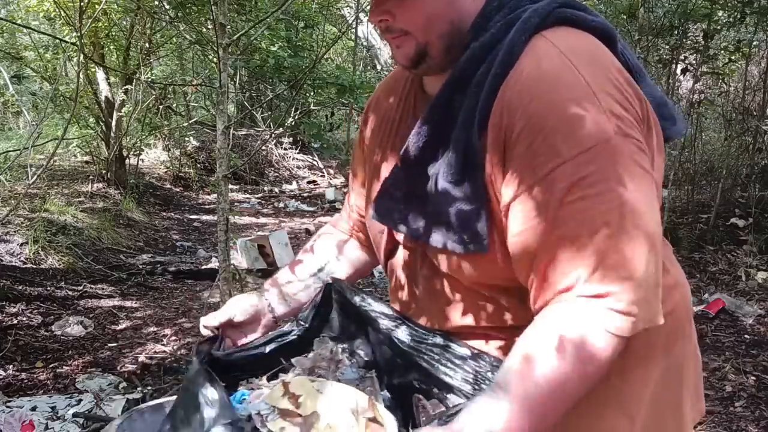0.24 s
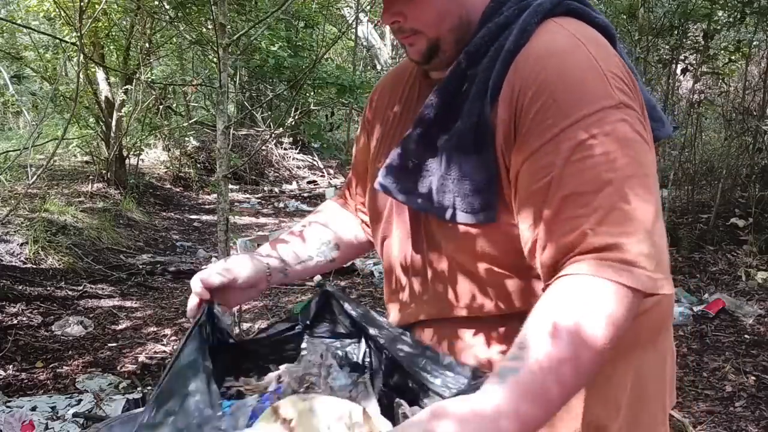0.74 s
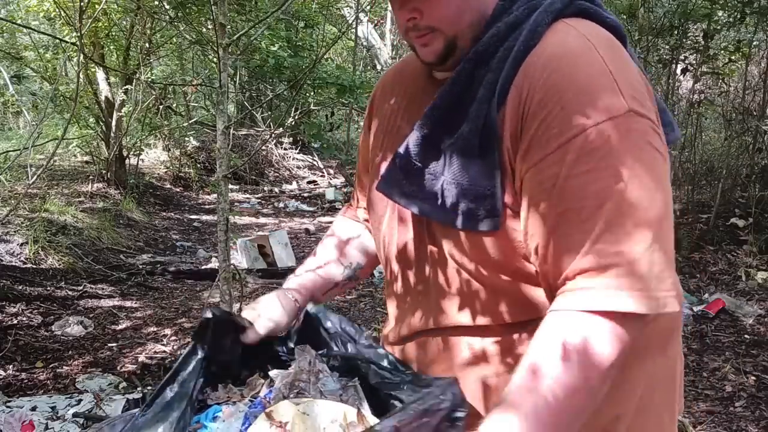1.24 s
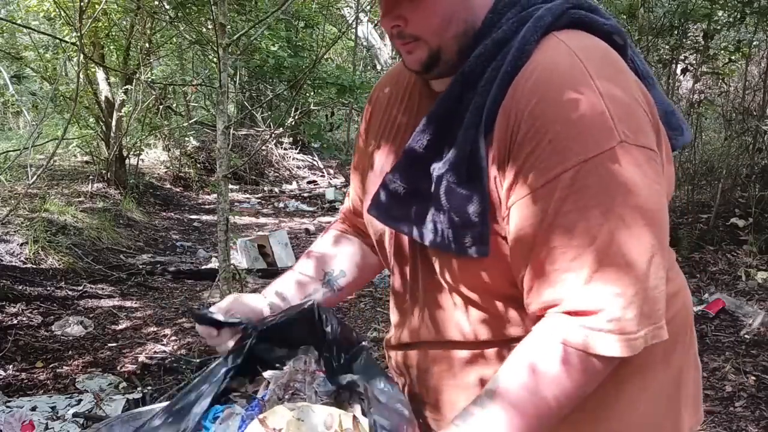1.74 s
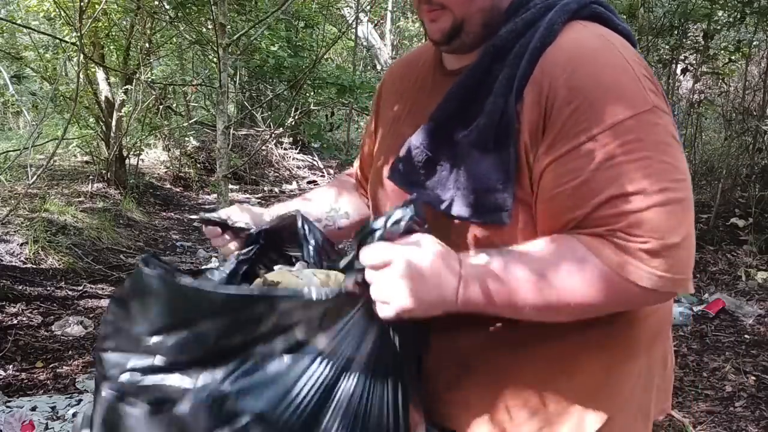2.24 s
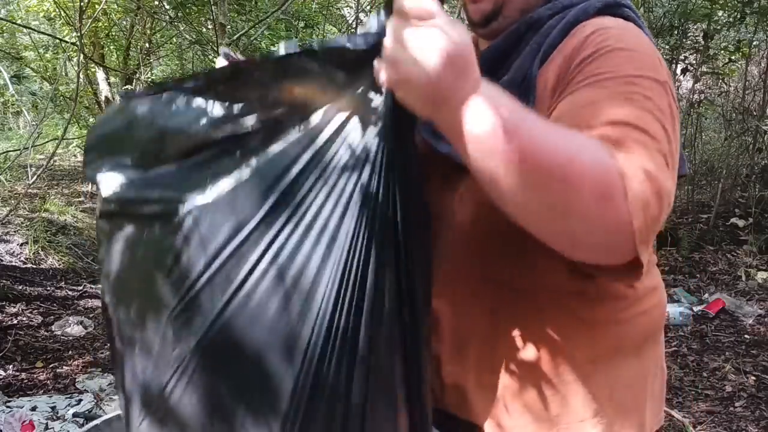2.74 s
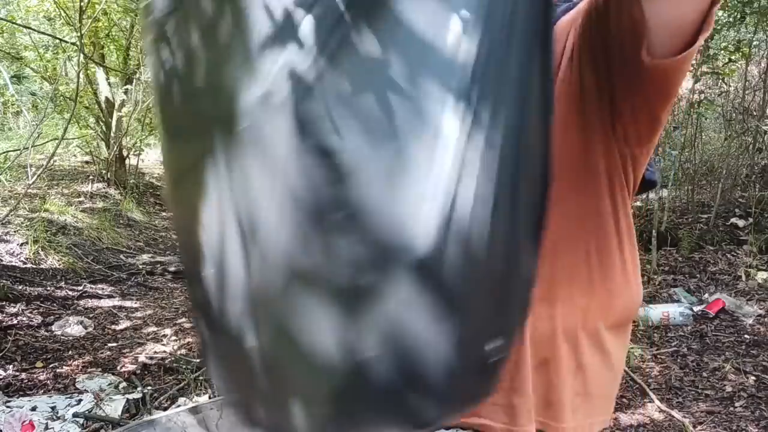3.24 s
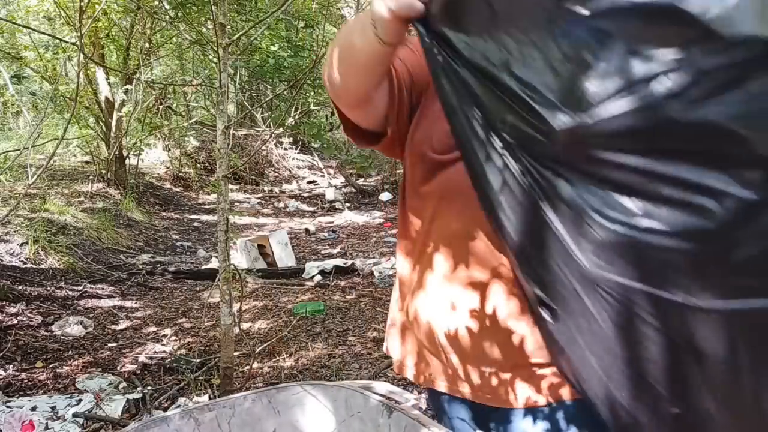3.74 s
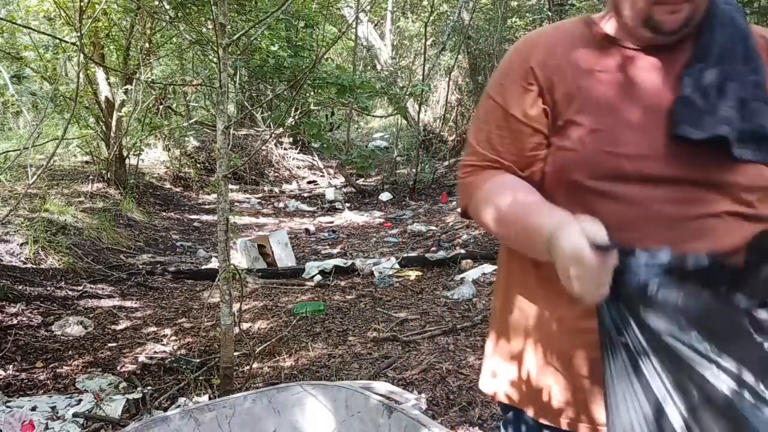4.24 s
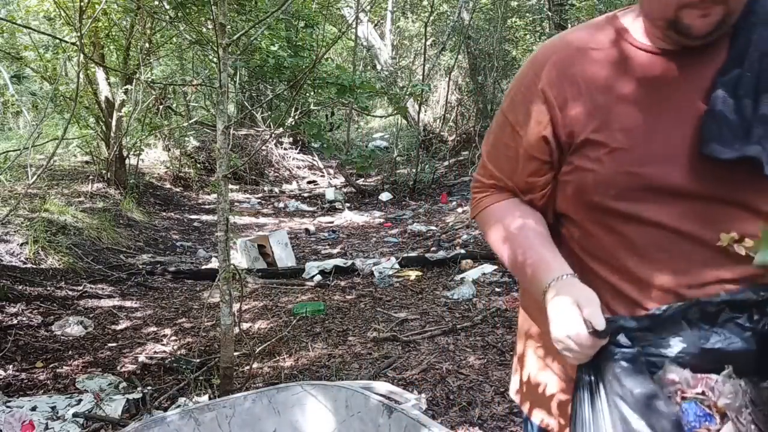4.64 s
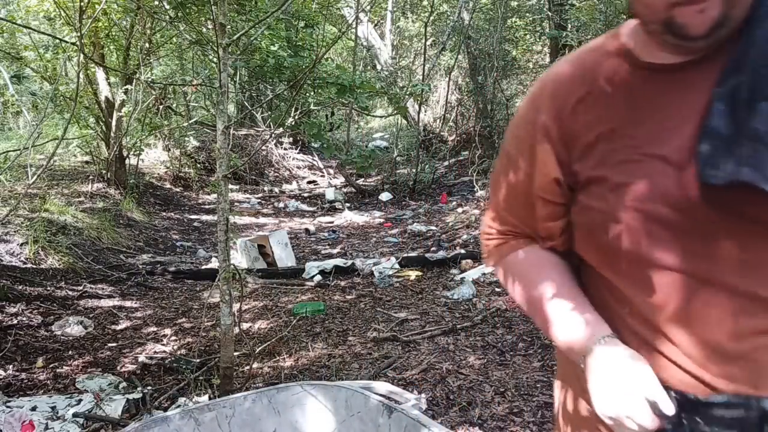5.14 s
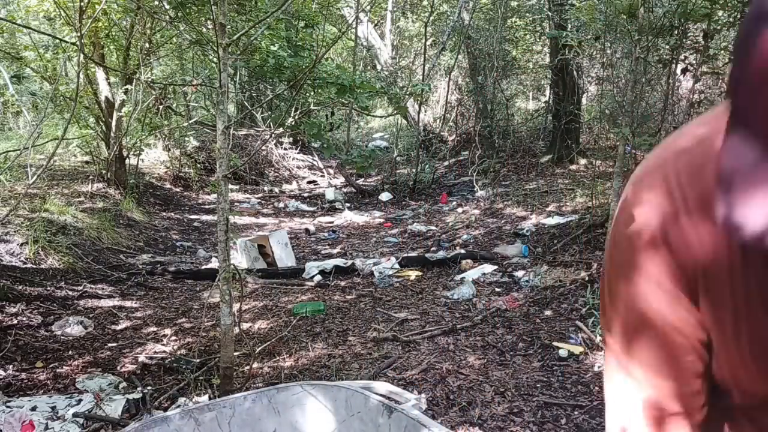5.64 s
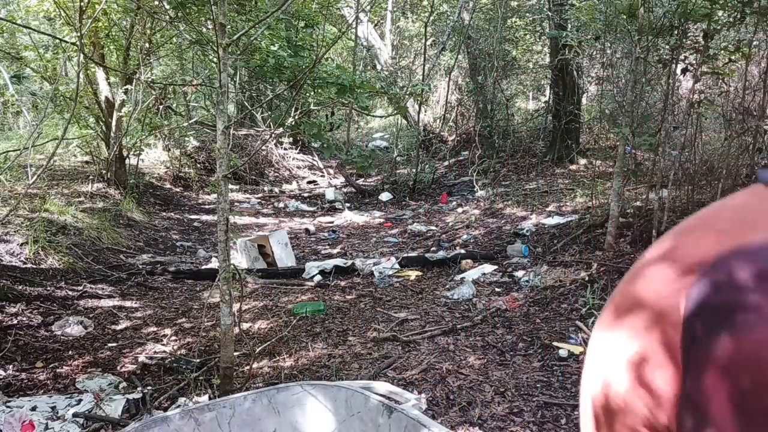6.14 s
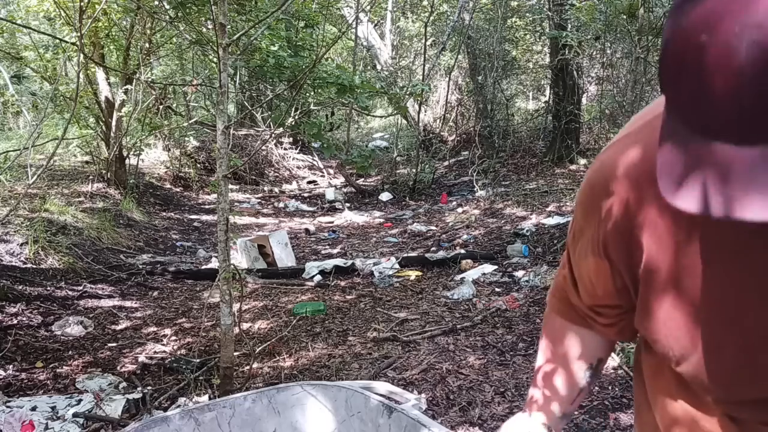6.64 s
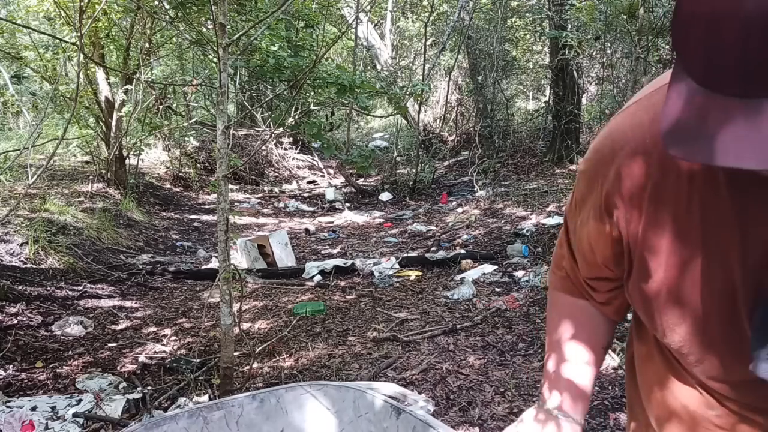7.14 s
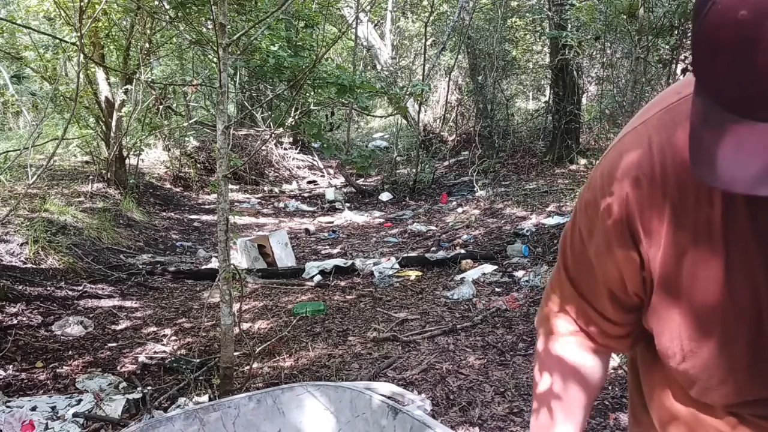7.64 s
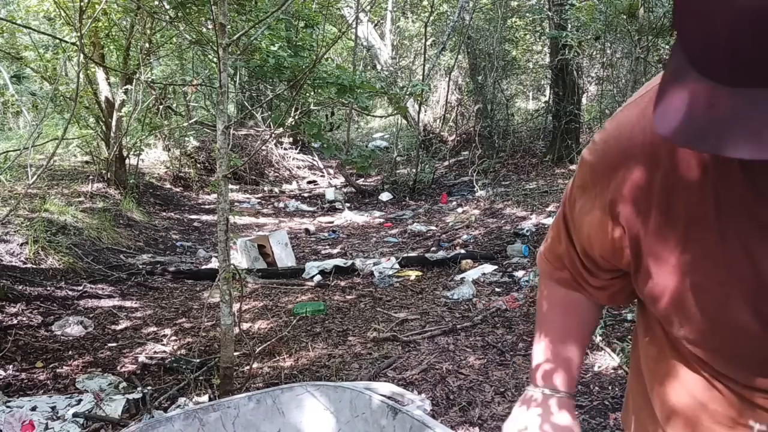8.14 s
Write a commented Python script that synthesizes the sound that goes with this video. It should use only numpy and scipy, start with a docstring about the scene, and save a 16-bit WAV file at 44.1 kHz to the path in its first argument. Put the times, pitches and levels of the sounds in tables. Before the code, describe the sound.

Bright, dry plastic crinkling begins at once on the left, with snapping creases and loose clicks. A heavy clump of muffled litter knocks follows as the bag is lifted, then it quietens and moves rightward. A sudden crunch, softer rustles, a busy rattling, crackling flurry and a few last crinkles follow, close up, with faint outdoor air and very short echo.

```python
"""A thin plastic trash bag of litter starts hissing and crackling at once, in the faint air of a quiet wood.
It is opened, lifted, swung aside and set down, moving from the left of a two-port microphone towards its right.
Film, litter and walls are short grains over noise; knocks and creases that snap are fading tones with noise.
Dry ticks are single clicks, the booms near the end are a low sine, and ground and trunks add a short echo."""
import sys
import numpy as np
from scipy import signal
from scipy.fft import rfft, irfft, next_fast_len
from scipy.io import wavfile
from scipy.ndimage import uniform_filter1d, map_coordinates

SR = 44100
rng = np.random.default_rng(int(sys.argv[2]) if len(sys.argv) > 2 else 0)


def master(y):
    """Save y as 16-bit WAV."""
    cut = np.clip(np.atleast_2d(y).T, -1, 1)
    pcm = np.round(cut * 32767)  # scale
    wavfile.write(sys.argv[1], SR, pcm.astype(np.int16))


N = 369558  # length in samples

# Colour of the still air: [f/Hz, relative level/dB]
AIR_COLOUR = [(15, -38), (25, -0.5), (70, 4), (560, -33), (936, -36), (4250, -6.5), (8140, -11.5),
              (12200, -6), (16000, -8)]
# Colours of the rustling film, litter and slack walls: [f/Hz, relative level/dB]
FILM_COLOUR = [(710, -12.5), (1200, -4), (1490, -3), (1790, -5), (4650, -2), (8440, -3), (12300, 0.5),
               (15200, -1), (16000, -18)]
LITTER_COLOUR = [(150, -25), (250, 1.5), (429, -2), (568, -1), (737, 0.5), (1040, -1.5), (3000, -5),
                 (3900, -21), (6600, -120)]
WALL_COLOUR = [(15, -57), (25, -6.5), (113, 3), (155, -1), (200, 6.5), (288, -5.5), (450, -1.5), (580, -35),
               (990, -120)]
# Tugs of the hands: [full strength from t/s, held t/s, first film level/dB, last film level/dB,
# litter level against film/dB]
TUGS = [(0, 0.097, -34, -36.5, -14.5), (.135, 0.075, -33, -35.5, -6), (0.368, 0.09, -33.5, -32, -7),
        (0.532, 0.26, -37.5, -39, -8), (.86, 0.096, -46, -47.5, -24), (1.22, 0.2, -43, -37, -36),
        (1.44, 0.35, -38, -34.5, -22.5), (1.8, 0.012, -39.5, -32, -1.5), (1.871, 0.26, -40, -40, -6),
        (2.276, 0.18, -31.5, -37, -9), (2.511, 0.089, -32, -32, -5.5), (2.716, .2, -34, -48, -8.5),
        (2.96, .015, -45.5, -50, 2), (3.035, 0.03, -42, -39, -3.5), (3.15, 0.11, -49, -55, -15),
        (3.43, 0.074, -49, -47.5, -20), (3.639, 0.16, -41.5, -55, -11.5), (3.95, 0.041, -47, -49.5, -21),
        (4.091, 0.2, -37, -37, -12.5), (4.204, 0.029, -22, -21.5, -3.5), (4.32, 0.22, -37, -46.5, -10),
        (4.569, 0.048, -39, -40.5, -5), (4.65, 0.49, -39, -60.5, -12), (4.95, 0.2, -46, -51, -8),
        (5.282, 0.17, -40.5, -38.5, -8), (5.5, 0.17, -39, -29.5, -15), (5.7, 0.21, -34, -35, -0.5),
        (5.83, 0.22, -32.5, -29, -3), (6.16, 0.17, -38, -31.5, -4.5), (6.412, 0.16, -33.5, -29.5, -16),
        (6.6, 0.031, -29.5, -26, -13), (6.72, 0.11, -40, -41.5, -17.5), (6.859, 0.05, -37, -37.5, -13),
        (6.96, 0.04, -44.5, -45, -5.5), (7.09, 0.18, -43.5, -51, -19), (7.38, 0.079, -45.5, -43.5, -34),
        (7.609, 0.17, -35, -35.5, -21.5), (7.822, 0.22, -29, -30, -13.5), (8.34, 0.022, -57, -48, -35.5)]
# Litter knocking together: [t/s, strength level/dB, base ring f/Hz]
KNOCKS = [(0.13, -21, 636), (0.424, -32, 194), (0.544, -29, 230), (1.919, -23, 208), (1.973, -22.5, 248),
          (2.336, -7.5, 218), (2.383, -13.5, 504), (2.422, -25, 193), (2.482, -29, 120), (2.521, -24, 324),
          (2.774, -25, 680), (2.829, -20, 371), (2.869, -24, 71), (3.162, -36, 304), (3.421, -39.5, 291),
          (3.858, -45, 520), (4.458, -31.5, 810), (4.545, -35, 287), (4.836, -31, 406), (4.947, -29, 910),
          (5.475, -34.5, 370), (5.775, -15.5, 895), (5.822, -12, 525), (5.829, -9.5, 607),
          (5.888, -8.5, 580), (5.937, -11, 254), (6.03, -13.5, 606), (6.151, -15, 640), (6.24, -18, 577),
          (6.275, -18, 122), (6.546, -26, 344), (6.957, -35, 270), (7.673, -20.5, 900), (7.688, -21, 920),
          (7.689, -30, 322)]
# Slack walls flopping: [full strength from t/s, held t/s, level/dB]
FLOPS = [(.16, 0.021, -45), (0.398, 0.16, -43), (.62, 0.15, -49.5), (1.93, 0.17, -39), (2.06, 0.13, -45),
         (2.23, 0.082, -42), (2.345, 0.01, -33.5), (2.39, 0.071, -36.5), (2.49, 0.11, -48),
         (2.84, 0.084, -43.5), (2.96, 0.019, -42), (3.17, 0.0097, -48), (3.43, 0.016, -53),
         (4.21, 0.016, -40), (5.7, .26, -62), (6.28, 0.013, -46), (6.97, 0.089, -47.5),
         (7.91, 0.027, -48.5)]
# Creases snapping through: [t/s, strength level/dB, base ring f/Hz, crack level against strength/dB]
SNAPS = [(0.382, -14.5, 1760, -12), (0.5004, -15.5, 2010, 5.5), (0.7389, -38, 1150, 11.5),
         (1.7857, -16, 2590, -1), (1.8045, -24, 2700, -4), (1.8144, -21.5, 2889, -7),
         (1.9169, -23.5, 910, 4.5), (1.938, -21, 2930, -6), (1.9724, -24, 1022, -14), (2.382, -27, 1160, 2),
         (2.7744, -28.5, 1160, -9), (2.977, -31.5, 5070, 3.5), (3.747, -32.5, 6100, -2.5),
         (4.2132, -14.5, 1420, 0), (5.6588, -16, 1185, 1), (5.702, -13.5, 1090, -11),
         (5.8222, -14, 1020, 2.5), (5.8877, -18, 1090, 7.5), (5.938, -17, 1000, -1),
         (6.0127, -17.5, 1590, 3.5), (6.0293, -16.5, 1320, 5), (6.1498, -15.5, 1980, -4),
         (6.1629, -17, 1160, -4), (6.294, -27, 4000, 0)]
# Single creases flicking over, one dry click each: [t/s, peak level/dB]
TICKS = [(0.5205, -26), (0.5445, -21), (0.592, -17), (1.4246, -15), (3.0336, -24), (3.283, -27.5),
         (5.94, 0.5), (5.9658, -2)]
# The full bag booms and rebounds when set down: [full strength from t/s, held t/s, level/dB]
BOOMS = [(7.072, 0.015, -38.5), (7.115, 0.014, -41), (7.185, 0.0091, -47)]
# Where the bag is: [t/s, left minus right level/dB, left arrives later by t/ms]
BAG_PLACE = [(0, 4, -0.087), (3.7, 4.5, -0.045), (4.05, 0.5, 0.24), (6.7, 1.5, 0.21), (7.1, 2.5, 0.18),
             (8.38, 1.5, 0.18)]
# How alike the two channels of the bag are: [f/Hz, likeness from 0 to 1]
LIKENESS = [(30, 0.76), (125, 0.97), (500, 0.94), (1000, 0.55), (2000, 0.36), (4000, 0.44), (12000, 0.031)]
# Difference in colour of the two ports: [f/Hz, left minus right level/dB]
PORT_TILT = [(60, 1), (300, -0.5), (1000, -2.5), (4000, -1), (8000, -1.5), (14000, 3.5)]

AIR_DB = -54.5
# every tug sets in and lets go alike; the film never lies quite still
TUG_RISE_DB_S, TUG_FALL_DB_S, FILM_REST_DB = 164, 198, -54
# the litter starts and stops more abruptly than the film
LITTER_STEEPER, LITTER_REST_DB = 1.44, -85
# between flops the walls follow the litter
FLOP_RISE_DB_S, FLOP_FALL_DB_S, WALL_UNDER_LITTER_DB = 699, 176, -18.5
# lesser ticks come at random times, as strong as the rustle allows
TICK_HZ, TICK_COUNT, TICK_OVER_FILM_DB, TICK_SPREAD_DB = 3000, 500, 3, 3
BOOM_RISE_DB_S, BOOM_FALL_DB_S = 400, 500
# pitch at the first boom; the belly tightens as it settles
BELLY_HZ, BELLY_RISE_HZ_S = 117.5, 110
ECHO_DB = -19.5
SHADOW_HZ = 900  # the microphone body shades mainly the sound above this
TOP_HZ = 16000  # band limit


def amp(db):
    """Turn decibels into an amplitude factor."""
    return 10 ** (np.asarray(db) / 20)


def unit(x):
    """Scale a signal to an average (RMS) strength of one."""
    return x / np.sqrt(np.mean(x ** 2) + 1e-20)


def along(points, hz):
    """Read a curve of (f/Hz, value) points on a logarithmic frequency axis."""
    f, value = np.transpose(points)
    return np.interp(np.log(hz + 1), np.log(f + 1), value)


def curves(rows):
    """Give one value per sample for each column after the time."""
    s, *columns = np.transpose(rows)
    return [np.interp(np.arange(N) / SR, s, column) for column in columns]


def wobble(rate):
    """Draw a smooth random curve with this many random points a second."""
    points = rng.standard_normal(int(N * rate / SR) + 4)
    return map_coordinates(points, [np.arange(N) * rate / SR])


def filtered(x, response):
    """Multiply the spectrum of x by a response that depends on frequency."""
    m = next_fast_len(N + SR // 2)
    return irfft(rfft(x, m) * response(np.fft.rfftfreq(m, 1 / SR)), m)[..., :N]


def strokes(rows, rise_db_s, fall_db_s, rest_db):
    """Level/dB of overlapping gestures [t/s, held t/s, first dB, last dB]: rise, hold, fall; powers add."""
    t = np.arange(N) / SR
    power = amp(2 * rest_db)
    for s, held, first_db, last_db in rows:
        end = s + held
        edges = rise_db_s * np.maximum(s - t, 0) + fall_db_s * np.maximum(t - end, 0)
        held_db = np.interp(t, [s, end], [first_db, last_db])
        power = power + amp(2 * (held_db - edges))
    return 10 * np.log10(power)


def still_air():
    """The air of the wood is a steady coloured noise, unrelated in the two channels."""
    noise = rng.standard_normal((2, N))
    return amp(AIR_DB) * unit(filtered(noise, lambda hz: amp(along(AIR_COLOUR, hz))))


def efforts():
    """The hands' tugs drive film and litter; the walls follow the litter and flop: three levels in dB."""
    film_rows = [row[:4] for row in TUGS]
    film_db = strokes(film_rows, TUG_RISE_DB_S, TUG_FALL_DB_S, FILM_REST_DB)
    litter_rows = [(s, held, first + load, last + load) for s, held, first, last, load in TUGS]
    litter_db = strokes(litter_rows, LITTER_STEEPER * TUG_RISE_DB_S,
                        LITTER_STEEPER * TUG_FALL_DB_S, LITTER_REST_DB)
    flop_rows = [(s, held, db, db) for s, held, db in FLOPS]
    wall_db = strokes(flop_rows, FLOP_RISE_DB_S, FLOP_FALL_DB_S, litter_db + WALL_UNDER_LITTER_DB)
    return film_db, litter_db, wall_db


def grains(count, lo_hz, hi_hz, cycles, spread_db, size):
    """Fading wavelets at random times, pitches and heavy-tailed strengths; equal energy per hertz."""
    when, pitch, chance = rng.random((count, 3)).T
    hz = (lo_hz * (hi_hz / lo_hz) ** pitch)[:, None]
    t = np.arange(size) / SR
    strength = amp(-spread_db * np.log(1.01 - chance))[:, None] * hz
    wave = strength * np.sin(2 * np.pi * hz * t) * np.exp(-hz * t / cycles)
    where = (when * N).astype(int)[:, None] + np.arange(size)
    return unit(np.bincount(where.ravel(), wave.ravel(), N + size)[:N])


def rustle(level_db, colour, grain, share, clump_db, rate):
    """Grains over friction noise, coloured and clumped; the two rows are unrelated parts of the bag."""
    friction = rng.standard_normal((2, N))
    raw = np.sqrt(share) * np.array(grain) + np.sqrt(1 - share) * friction
    coloured = filtered(raw, lambda hz: amp(along(colour, hz)))
    return amp(level_db) * unit(amp(clump_db * wobble(rate)) * coloured)


def patchy(x, patchy_db):
    """Each patch of film has its own colour: a smooth random gain over time and frequency."""
    z = signal.stft(x, nperseg=256)[2]
    field = rng.standard_normal(z.shape[1:])
    field = uniform_filter1d(field, size=8, axis=0)
    field = uniform_filter1d(field, size=6, axis=1)
    return signal.istft(z * amp(patchy_db * unit(field)), nperseg=256)[1][:, :N]


def film(level_db):
    """Thin film crackles in fine, high, very short grains over a hiss of friction."""
    fine = [grains(count=10000, lo_hz=1580, hi_hz=16000, cycles=0.81, spread_db=1.0, size=40)
            for _ in range(2)]
    return patchy(rustle(level_db, FILM_COLOUR, fine, share=0.32, clump_db=1.15, rate=40), patchy_db=1.5)


def litter(level_db):
    """Litter scrapes inside the bag in coarser, lower grains."""
    coarse = [grains(count=4000, lo_hz=300, hi_hz=3054, cycles=2.46, spread_db=2.5, size=300)
              for _ in range(2)]
    return rustle(level_db, LITTER_COLOUR, coarse, share=0.19, clump_db=1.13, rate=25)


def walls(level_db):
    """Slack walls flop slowly, in long, low grains."""
    thumps = [grains(count=2000, lo_hz=53.5, hi_hz=478, cycles=1.64, spread_db=2.5, size=1500)
              for _ in range(2)]
    return rustle(level_db, WALL_COLOUR, thumps, share=0.3, clump_db=4.1, rate=14)


def handling():
    """The same small jerks shake film, litter and walls, each by a different amount."""
    film_db, litter_db, wall_db = efforts()
    jerk = wobble(30) + 0.87 * wobble(90)
    return film(film_db + 0.82 * jerk) + litter(litter_db + 1.6 * jerk) + walls(wall_db + 0.24 * jerk)


def ticks():
    """A flicking crease gives a click of about one cycle, from one point of the film at a time."""
    when, chance, side = rng.random((TICK_COUNT, 3)).T
    at = (when * N).astype(int)
    film_db = efforts()[0]
    size = amp(film_db[at] + TICK_OVER_FILM_DB - TICK_SPREAD_DB * np.log(1.01 - chance))
    # row 1 places each random tick at its own spot between the sides
    hits = np.array([np.bincount(at, size, N), np.bincount(at, size * (2 * side - 1), N)])
    for s, db in TICKS:
        hits[0, round(s * SR)] -= amp(db)
    turn = 2 * np.pi * TICK_HZ * np.arange(SR // 200) / SR
    click = (1 - turn) * np.exp(-turn)  # push and equal pull: little bass
    return signal.fftconvolve(hits, click[None] / click.max(), axes=1)[:, :N]


def blows(table, ring_s, crack_scale_s, partials, rise, sag, apart):
    """Each blow is a noisy crack and a few fading, inharmonic partials; lower rings last longer."""
    out = np.zeros((2, N + SR))
    t = np.arange(SR // 4) / SR
    for s, db, hz, crack_db in table:
        phase, scatter = rng.random((2, 2, len(partials)))
        ring_t60 = ring_s * (300 / hz) ** 0.52  # ring_s is the time to fall 60 dB at 300 Hz
        crack_t60 = crack_scale_s * amp(0.032 * db + 4.0)  # a harder blow buckles more film and lasts longer
        crack = amp(crack_db - 60 * t / crack_t60) * rng.standard_normal((2, len(t)))
        ring = 0
        for k, (ratio, level) in enumerate(partials):
            fade = amp(level + 3.5 * scatter[:, k, None] - 60 * ratio * t / ring_t60)
            # the pitch sags as the struck wall slackens
            cycles = ratio * hz * t / (1 + sag * t / ring_t60)
            ring = ring + fade * np.sin(2 * np.pi * (cycles + phase[:, k, None]))
        contact = 1 - np.exp(-t / rise)  # contact builds over the rise
        start = round(s * SR)
        out[:, start:start + len(t)] += amp(db) * contact * (ring + crack)
    return out[:, :N] * [[1], [apart]]  # apart scales the difference between the sides


def without_deep_bass(x):
    """Small things radiate no deep bass: a gentle cut at 75 Hz, three times over."""
    return filtered(x, lambda hz: (1j * hz / (75 + 1j * hz)) ** 3)


def knocks():
    """Litter knocks dully, because the film damps the treble of each blow."""
    rows = [(*row, 3) for row in KNOCKS]  # every crack is 3 dB against its blow
    hits = blows(rows, ring_s=0.047, crack_scale_s=0.046,
                 partials=[(1.108, 1.0), (0.585, -18.5), (1.4, -5.0), (2.79, 0.0)],
                 rise=0.0036, sag=0.48, apart=1.0)
    return without_deep_bass(filtered(hits, lambda hz: 1 / (1 + 1j * hz / 1200) ** 2))


def snaps():
    """A crease snapping through gives a bright, short blow."""
    hits = blows(SNAPS, ring_s=0.042, crack_scale_s=0.016,
                 partials=[(1.044, -2.0), (1.82, -1.5), (0.566, -17)],
                 rise=0.00072, sag=0.14, apart=0.7)
    return without_deep_bass(hits)


def boom():
    """The air-filled belly of the bag is shaken at its one low resonance, a sine of wavering pitch."""
    rows = [(s, held, db, db) for s, held, db in BOOMS]
    level_db = strokes(rows, BOOM_RISE_DB_S, BOOM_FALL_DB_S, -np.inf)
    since_first = np.arange(N) / SR - BOOMS[0][0]
    hz = BELLY_HZ + BELLY_RISE_HZ_S * since_first + 10 * wobble(80)
    belly = np.sin(2 * np.pi * np.cumsum(hz) / SR)
    return np.outer([1, 0], np.sqrt(2) * amp(level_db + 4.4 * wobble(60)) * belly)


def trees(x):
    """Ground and trunks scatter the sound briefly, as fading noise."""
    t = np.arange(SR // 4) / SR
    noise = np.diff(rng.standard_normal((1, len(t) + 1)))  # thin trunks scatter mostly treble
    tail = noise * amp(-60 * t / 0.1)  # falls 60 dB in 0.1 s
    return signal.fftconvolve(x, tail / np.linalg.norm(tail), axes=1)[:, :N]


def ports(pair):
    """The ports share the bass and differ in the treble; level and arrival time follow the bag."""
    def turn(hz):
        return np.arccos(np.clip(along(LIKENESS, hz), -1, 1)) / 2

    mid, side = filtered(pair, lambda hz: np.array([np.cos(turn(hz)), np.sin(turn(hz))]))
    pan_db, lag_ms = curves(BAG_PLACE)
    shift = lag_ms * SR / 2000  # half the lag, in samples, for each port
    left = map_coordinates(mid + side, [np.arange(N) - shift], order=3, mode="nearest")
    right = map_coordinates(mid - side, [np.arange(N) + shift], order=3, mode="nearest")
    both = np.array([left, right])
    bass = filtered(both, lambda hz: 1 / (1 + (hz / SHADOW_HZ) ** 2))
    return bass + (both - bass) * amp([pan_db / 2, -pan_db / 2])


def scene():
    """The bag and its echo reach the two ports, over the still air."""
    bag = handling() + ticks() + knocks() + snaps() + boom()
    return ports(bag + amp(ECHO_DB) * trees(bag)) + still_air()


def record(dry):
    """The two ports differ in colour; nothing passes above the band limit."""
    return filtered(dry, lambda hz: amp(np.outer([.5, -.5], along(PORT_TILT, hz))) * (hz < TOP_HZ))


dry = scene()
out = record(dry)
master(out)
```